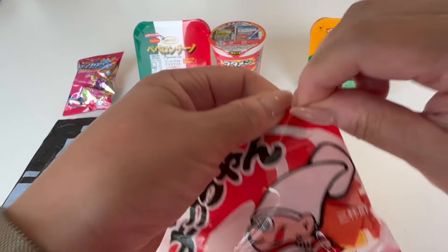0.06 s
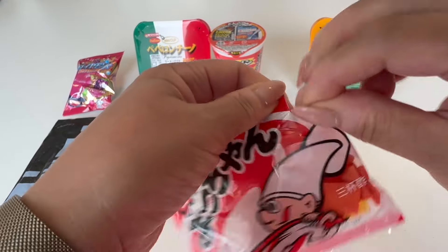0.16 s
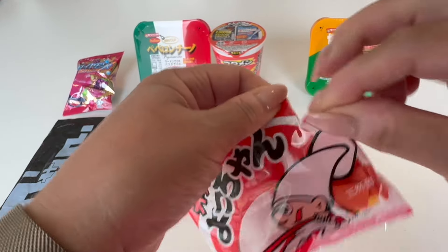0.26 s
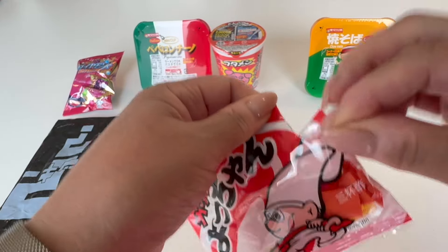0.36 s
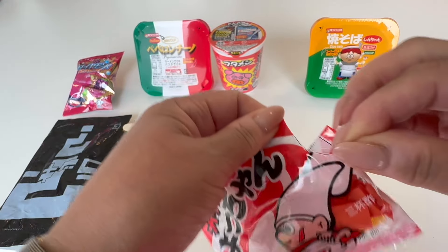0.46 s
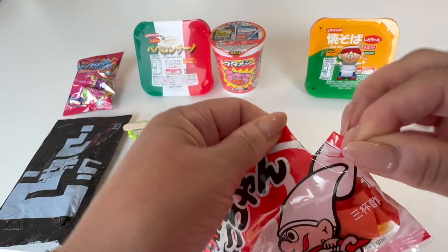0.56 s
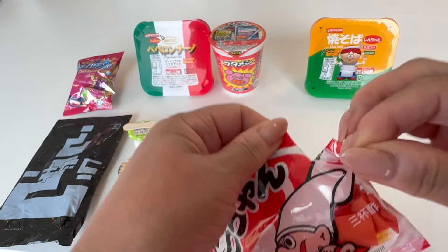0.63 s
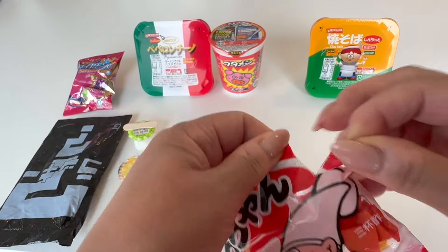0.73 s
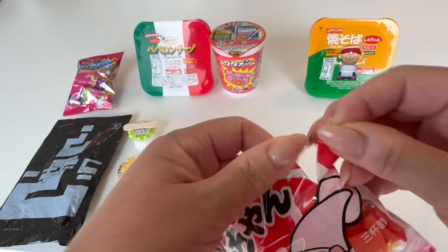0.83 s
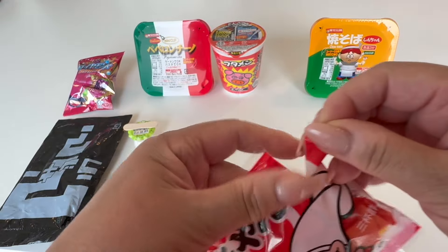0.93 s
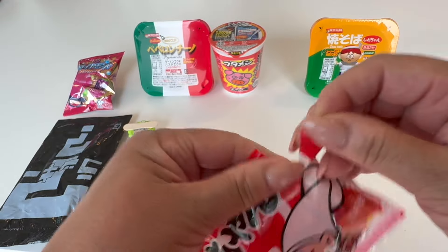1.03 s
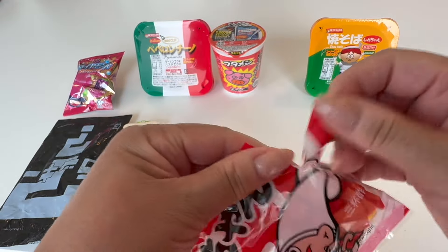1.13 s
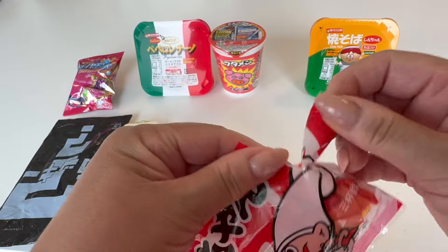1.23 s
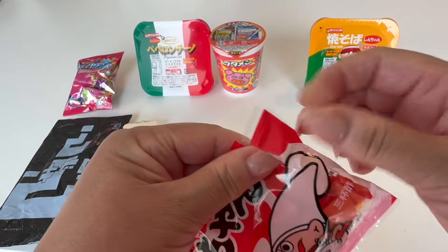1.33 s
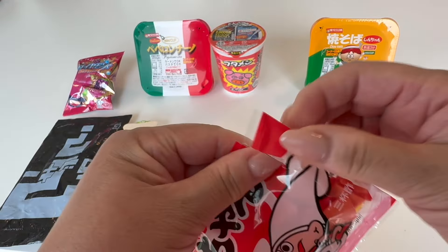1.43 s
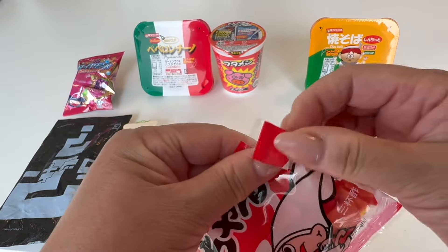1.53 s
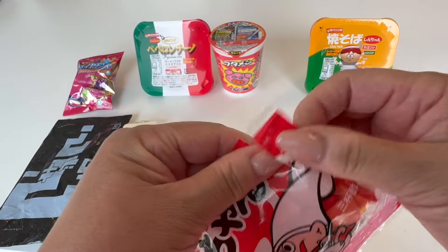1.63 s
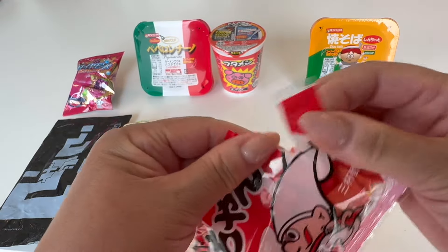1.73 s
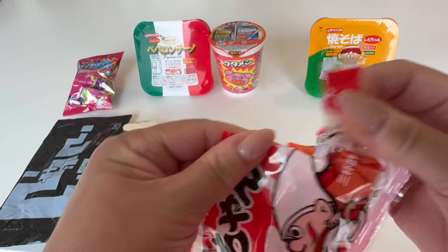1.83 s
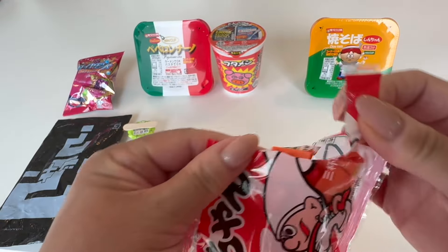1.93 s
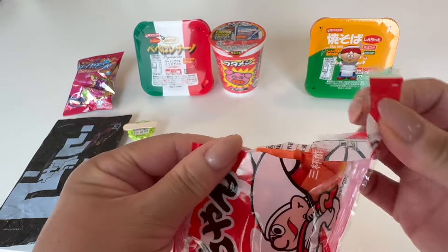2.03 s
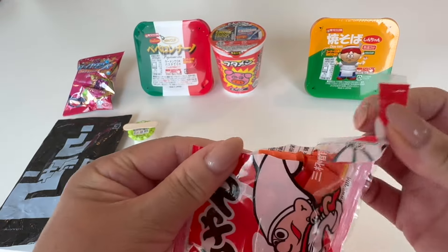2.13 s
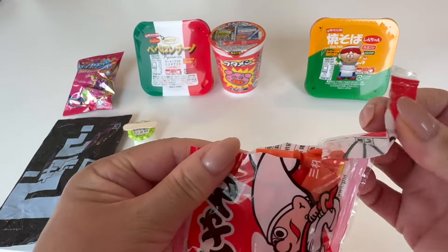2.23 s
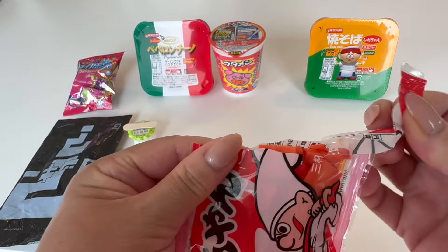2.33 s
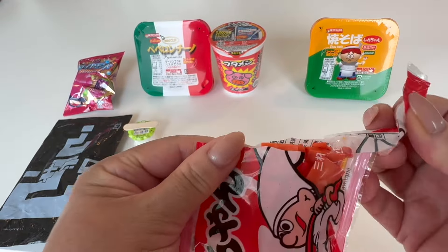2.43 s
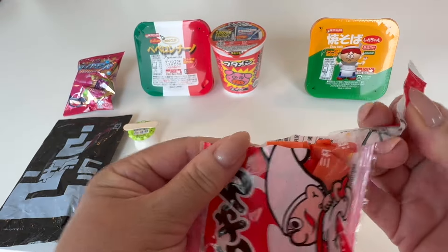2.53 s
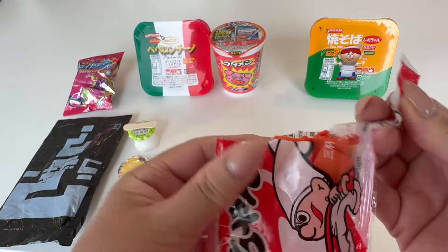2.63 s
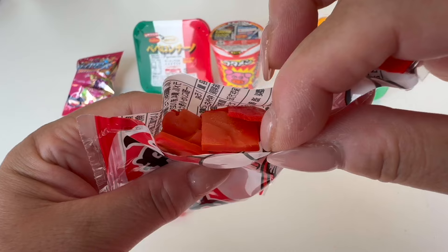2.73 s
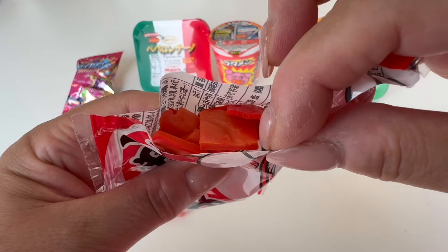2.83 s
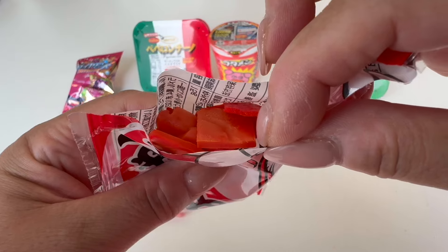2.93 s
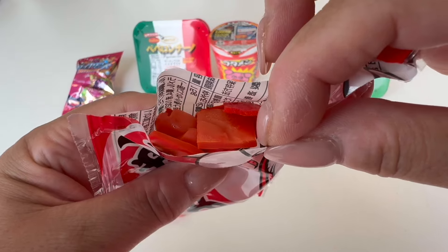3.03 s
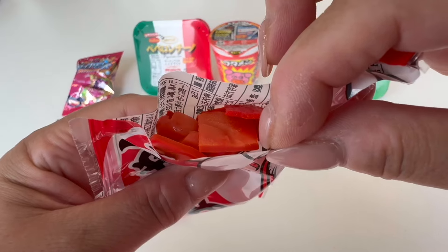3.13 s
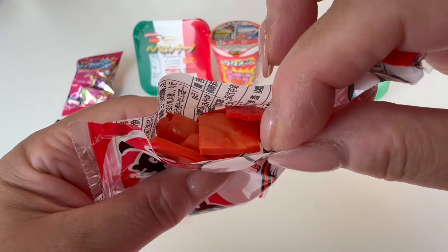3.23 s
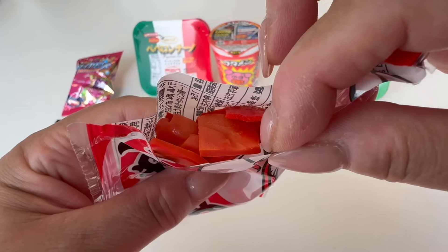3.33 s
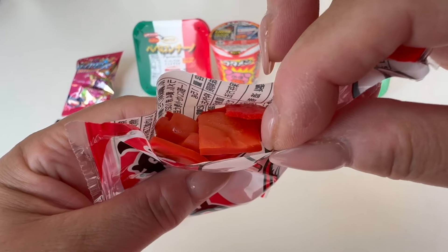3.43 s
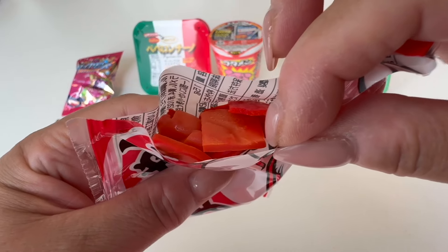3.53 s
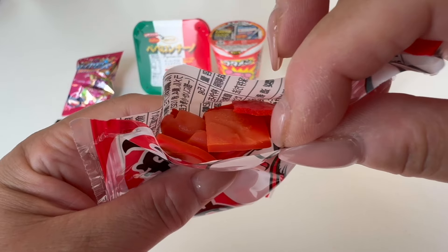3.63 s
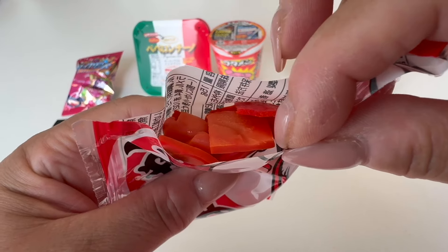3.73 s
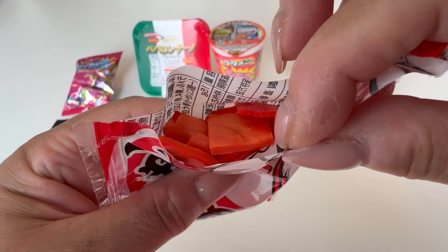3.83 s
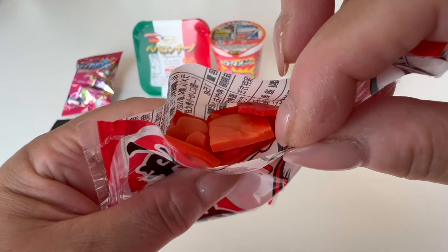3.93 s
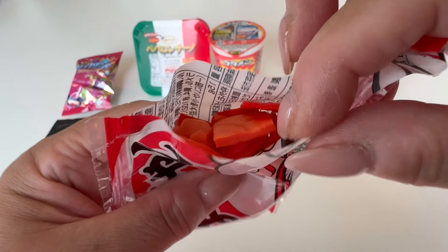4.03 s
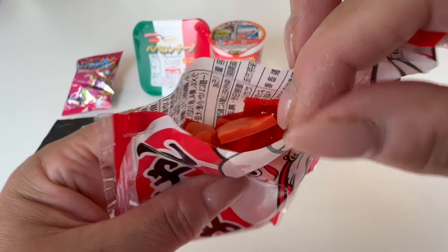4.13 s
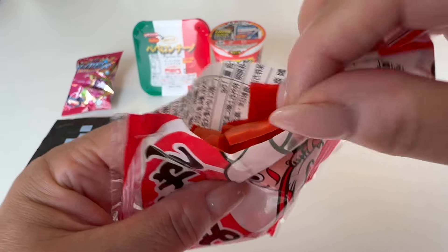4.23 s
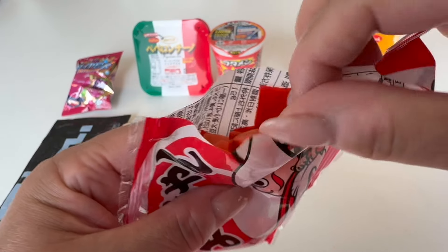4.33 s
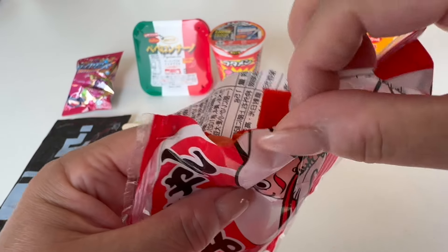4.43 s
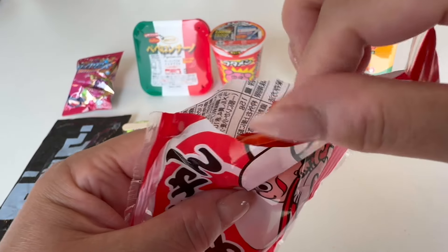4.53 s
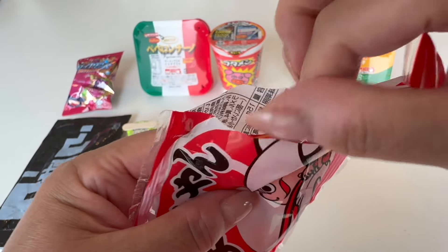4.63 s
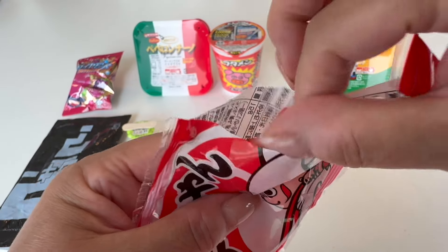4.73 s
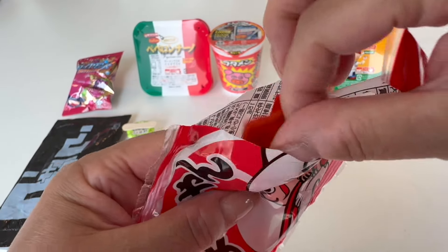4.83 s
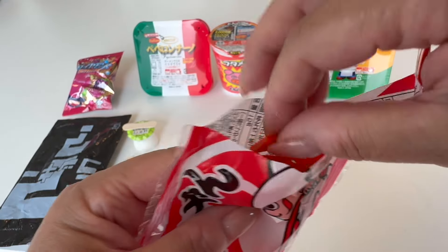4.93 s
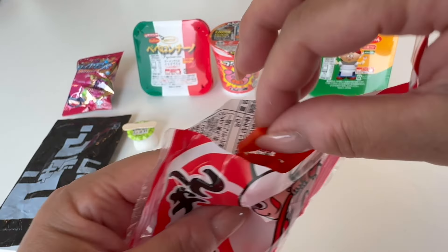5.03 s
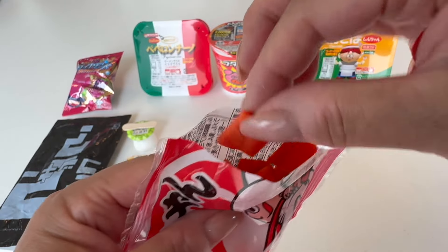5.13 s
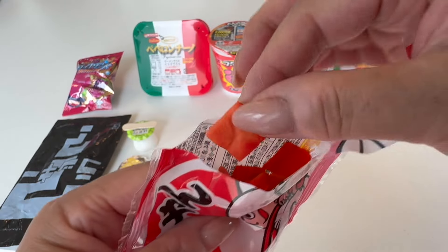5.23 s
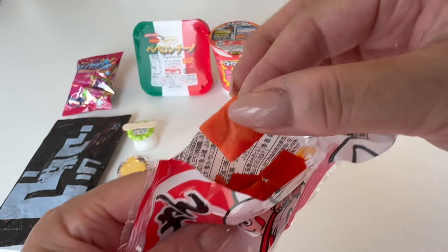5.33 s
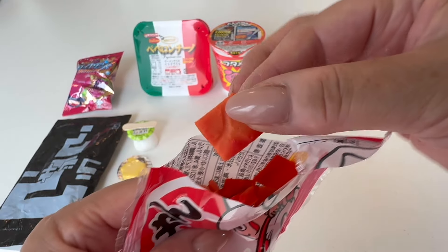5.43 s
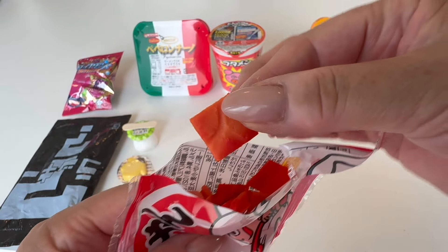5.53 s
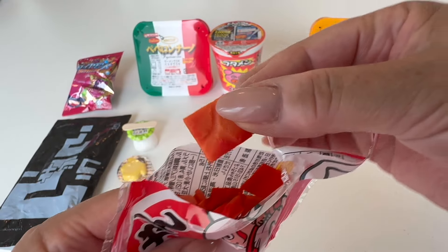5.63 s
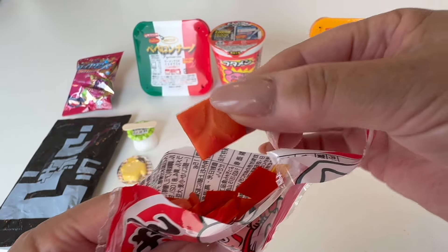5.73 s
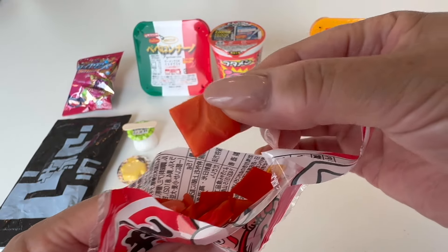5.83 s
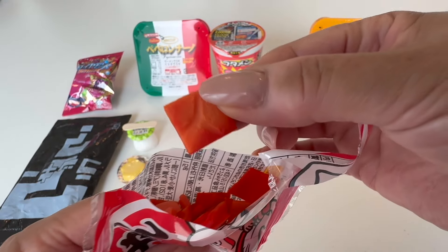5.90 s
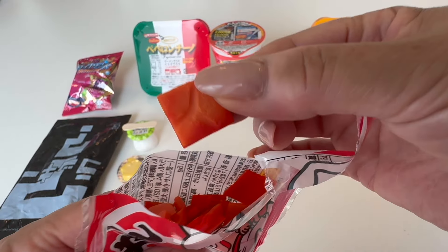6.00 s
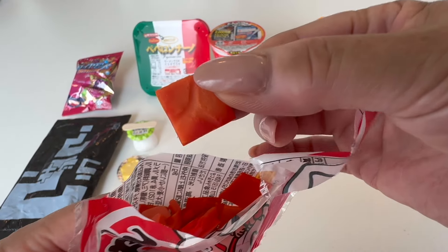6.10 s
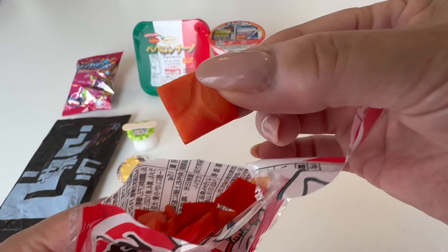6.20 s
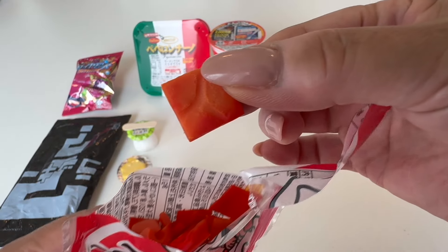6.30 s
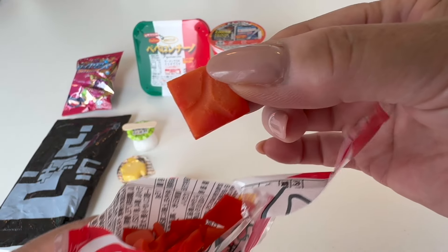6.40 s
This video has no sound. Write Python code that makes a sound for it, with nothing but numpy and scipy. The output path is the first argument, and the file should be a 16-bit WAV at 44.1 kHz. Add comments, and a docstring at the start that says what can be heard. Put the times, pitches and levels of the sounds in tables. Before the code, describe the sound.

Fingers crinkle and tear open a small plastic snack packet up close, crackling brightly, then a sudden lull and sparser, softer crinkles indoors.

```python
"""Hands crinkle and tear a small plastic snack packet close to a phone in a quiet, hard-walled room.
Each crease of the film snaps with a bright tick and a short ring; the air in the bag sometimes thuds.
Each squeeze adds a rush of fine crackle, the hiss of sliding skin and a rumble; the room adds a soft tail.
Crackle and tail stop abruptly at 2.73 s; sparser handling follows from 3.86 s.
Coloured noise makes the steady room hum, with a faint mains tone and a low tone that swells at 5.45 s."""
import sys
import numpy as np
from scipy import signal
from scipy.fft import rfft, irfft, next_fast_len
from scipy.io import wavfile
from scipy.ndimage import uniform_filter1d

SR = 44100
rng = np.random.default_rng(int(sys.argv[2]) if len(sys.argv) > 2 else 0)


def to_wav(s):
    """Save 16-bit WAV."""
    ch = np.atleast_2d(s).T  # columns
    pcm = np.round(np.clip(ch, -1, 1) * 32767)  # PCM
    wavfile.write(sys.argv[1], SR, pcm.astype(np.int16))


N = 284886
CUT_S = 2.733  # crackle and room tail stop here

# broad part of a film ring: (frequency [Hz], relative level [dB])
FILM_SPECTRUM = [(300, -19.5), (1200, 5), (2500, 0), (8000, -7), (9500, -3), (17000, -37.5)]
# tick of a crease, also the colour of the skin hiss: (frequency [Hz], relative level [dB])
TICK_SPECTRUM = [(5000, -4.5), (8500, -2.5), (10500, 2.5), (15500, 5), (16800, -33.5)]


def gain_of(db):
    """Decibels to an amplitude factor."""
    return 10 ** (np.asarray(db) / 20)


def evened(x):
    """Scales to rms 1."""
    return x / np.sqrt(np.mean(x ** 2) + 1e-20)


def smoothed_noise(length_s):
    """Slowly wandering noise of rms 1: white noise under a moving average."""
    return evened(uniform_filter1d(rng.standard_normal(N), round(length_s * SR)))


def read(points, hz):
    """Interpolates a table on a log-frequency axis."""
    table_hz, value = np.transpose(points)
    return np.interp(np.log(hz + 1), np.log(table_hz + 1), value)


def coloured(x, points):
    """Filters along the last axis by a spectrum table in dB."""
    size = x.shape[-1]
    hz = np.fft.rfftfreq(size, 1 / SR)
    return irfft(rfft(x) * gain_of(read(points, hz)), size)


def burst(noise, points, rise_s, t60_s):
    """A coloured noise burst, exponential in rise and decay, whose first 1.5 ms have rms 1."""
    t = np.arange(noise.shape[-1]) / SR
    x = coloured(noise, points) * (1 - np.exp(-t / rise_s)) * gain_of(-60 * t / t60_s)
    return x / np.sqrt(np.mean(x[..., :66] ** 2, -1, keepdims=True))


def swell(start_s, rise_s, fade_db_per_s):
    """An envelope that rises in a straight line, then fades at a steady dB rate."""
    t = np.arange(N) / SR - start_s
    return np.clip(t / rise_s, 0, 1) * gain_of(-fade_db_per_s * np.maximum(t - rise_s, 0))


def pressing(column):
    """Summed squeeze envelopes of crackle (column 1) or hiss (column 2); those before the cut end there."""
    # squeezes of the fingers: (start [s], relative crackle level [dB], skin hiss level [dB])
    squeezes = [(-0.03, -42, -50), (0.269, -39, -81), (0.659, -43.5, -51), (0.9, -47, -55), (1.1, -47, -47),
                (1.27, -40, -58), (1.598, -44, -62), (1.77, -40.5, -50), (2.29, -55, -55), (2.48, -50, -48),
                (2.579, -36, -65), (3.88, -67, -68), (3.965, -68, -68), (4.183, -43, -50), (4.44, -54, -56),
                (4.62, -48.5, -62), (4.699, -51.5, -55), (6.1, -60, -62.5), (6.38, -49.5, -71)]
    before = np.arange(N) < CUT_S * SR
    total = np.zeros(N)
    for row in squeezes:
        start_s = row[0]
        envelope = swell(start_s, rise_s=0.019, fade_db_per_s=77)
        total += gain_of(row[column]) * envelope * (before | (start_s > CUT_S))
    return total


def crackle(per_s=380, spread_db=5.5):
    """Many tiny creases of random size and colour, a rumble and skin hiss, louder where fingers press."""
    # the bag shifting in the hand: (frequency [Hz], relative level [dB])
    rumble_spectrum = [(90, -4.5), (250, 1), (900, -19.5)]
    clump_db, grain_db = 4, 2.5  # unevenness per standard deviation
    clumps = smoothed_noise(0.015)
    size_db = clump_db * clumps + spread_db * np.minimum(rng.exponential(1, N), 3)
    size = gain_of(size_db) * (rng.random(N) < per_s / SR)

    kinds = 12  # each tiny crease takes one of these sounds
    kind = rng.integers(0, kinds, N)
    rings, ticks = np.zeros((2, N)), np.zeros(N)
    for k in range(kinds):
        noise = rng.standard_normal((3, 512))
        train = size * (kind == k)
        ring = burst(noise[:2], FILM_SPECTRUM, rise_s=0.00072, t60_s=0.014)
        tick = burst(noise[2], TICK_SPECTRUM, rise_s=0.00039, t60_s=0.0051)
        rings += signal.oaconvolve(train[None], ring, axes=1)[:, :N]
        ticks += signal.oaconvolve(train, tick)[:N]

    # fingertips slide on the film with a high hiss, broken into short grains
    fine = smoothed_noise(0.002)
    skin = coloured(rng.standard_normal(N), TICK_SPECTRUM)
    skin = evened(skin * gain_of(clump_db * clumps + grain_db * fine))
    rumble = evened(coloured(rng.standard_normal(N), rumble_spectrum))
    grains = gain_of([[-6], [-8]]) * evened(rings)  # rows: left, right
    grains += gain_of(-35.5) * evened(ticks)
    grains += rumble * gain_of(-7 + clump_db * clumps)
    return pressing(column=1) * grains + pressing(column=2) * skin


def room(x):
    """A diffuse tail that builds within a few ms, each band dying at its own speed; cut off at CUT_S."""
    # decay of the tail: (frequency [Hz], t60 [s])
    decay = [(300, 0.6), (2000, 0.46), (5000, 0.67), (10000, 0.55), (16000, 0.089)]
    # colour of the tail: (frequency [Hz], level [dB])
    colour = [(300, -5.5), (2000, -11), (5000, -10.5), (10000, -17.5), (16000, -27.5)]
    hz, t, z = signal.stft(rng.standard_normal((2, SR)), SR, nperseg=256)
    z = z * gain_of(-60 * t / read(decay, hz)[:, None])
    z = z * (1 - np.exp(-(t / 0.00055) ** 2))
    z = z / np.linalg.norm(z, axis=-1, keepdims=True)  # equal energy in every band
    tail = signal.istft(z, SR, nperseg=256)[1]
    tail = coloured(tail / np.linalg.norm(tail[0]), colour)
    before = np.arange(N) < CUT_S * SR
    return sum(part * signal.fftconvolve(x * part, tail, axes=1)[:, :N] for part in (before, ~before))


def hum():
    """Steady air noise, alike at both ports only in the bass, a faint mains tone and a passing low tone."""
    # air noise: (frequency [Hz], relative level per Hz [dB])
    spectrum = [(40, -6.5), (52, -4.5), (66, -3.5), (80, -13), (130, -11.5), (160, -2), (240, -5),
                (480, -5.5), (1180, -14.5), (4480, -34), (8830, -46), (16500, -57)]
    # likeness of the ports: (frequency [Hz], left-right correlation [0-1])
    likeness = [(60, 0.94), (600, 0.79), (1200, 0.18), (2500, 0.18)]
    # balance: (frequency [Hz], left over right [dB])
    balance = [(60, 1.5), (950, 2.5), (15000, 7)]
    # room resonances: (frequency [Hz], boost [dB])
    booms = [(214, 5.5), (242, 7.2), (477, 6)]
    boom_width_hz, port_lag_s = 4.3, 0.00043  # the right port hears the hum later
    drone_hz, drone_db = 98, -52.5

    frames, hz = N // 2048 + 5, np.fft.rfftfreq(8192, 1 / SR)
    a, b, c, d, patches = rng.standard_normal((frames, 4097, 5)).T
    # level wanders a little over time and frequency
    patches = uniform_filter1d(patches, size=24, axis=0)
    patches = evened(uniform_filter1d(patches, size=3, axis=1))
    same = np.clip(read(likeness, hz), 0, 1)[:, None]
    left = a + 1j * b
    right = same * left + np.sqrt(1 - same ** 2) * (c + 1j * d)
    z = np.array([left, right])
    z[1] *= np.exp(-2j * np.pi * hz * port_lag_s)[:, None]
    booms_db = sum(db / (1 + ((hz - f) / boom_width_hz) ** 2) for f, db in booms)
    tilt_db = np.array([[.5], [-.5]]) * read(balance, hz)
    z *= gain_of((read(spectrum, hz) + booms_db + tilt_db)[..., None] + 1.1 * patches)
    air = gain_of(-47) * evened(signal.istft(z, nperseg=8192, noverlap=6144)[1][:, :N])

    t = np.arange(N) / SR
    mains = gain_of(-59.5) * np.sin(2 * np.pi * 50 * t)
    drone_level = gain_of(drone_db) * swell(start_s=5.45, rise_s=0.093, fade_db_per_s=15)
    drone = drone_level * np.sin(2 * np.pi * drone_hz * t)
    return air + drone + mains


def snap(ring_db, ring_hz, tick_db, tick_hz):
    """One crease: a film patch rings a few cycles under a bright tick; rows left, right, into the room."""
    # a ring leans on its pitch: (multiple of the pitch, relative level [dB])
    patch = [(.2, -23), (.65, -12), (0.999, -3), (1.6, -3.5), (5, -3)]
    tick_lean_db = -46.5  # times the square of the octaves from tick_hz
    t = np.arange(1024) / SR
    noise = rng.standard_normal((4, 1024))
    lean = [(k * ring_hz, db) for k, db in patch]
    # part shared by both ports, part differing between them
    port_noise = 0.3 * noise[0] + 1.52 * noise[1:3]
    broad = burst(coloured(port_noise, lean), FILM_SPECTRUM, rise_s=0.0007, t60_s=0.0078)
    cycles = ring_hz * t
    tone = np.sin(2 * np.pi * cycles) * cycles * gain_of(-8.5 * cycles)
    ring = gain_of(ring_db + np.array([[1.2], [-1.2]])) * (1.16 * broad + 7 * tone)

    bright = [(hz, read(TICK_SPECTRUM, hz) + tick_lean_db * np.log2(hz / tick_hz) ** 2)
              for hz in np.geomspace(5000, 17000, num=16)]
    tick = gain_of(tick_db) * burst(noise[3], bright, rise_s=.0005, t60_s=.0024)

    # summed over all directions the fine colour evens out: filtered pulses go into the room
    pulse = np.roll(t == 0, shift=128) * 1.
    soft_lean = [(hz, 0.9 * db) for hz, db in lean]
    wide_ring = coloured(coloured(pulse, soft_lean), FILM_SPECTRUM)
    wide_tick = coloured(pulse, bright)
    far = evened(wide_ring) * np.std(ring) + evened(wide_tick) * np.std(tick)
    return np.vstack([ring + tick, far])


def thud(level_db, hz):
    """The bag's air modes die within a few cycles and sag in pitch as the film slackens."""
    # modes of the bag: (multiple of the pitch, relative level [dB])
    bag_modes = [(0.551, -7), (0.999, 2), (1.5, -0.5), (2.2, 3.5)]
    t = np.arange(1024) / SR
    cycles = hz * t * (1 - 8 * t)
    modes = sum(gain_of(db - 6.37 * k * hz * t) * np.sin(2 * np.pi * k * cycles) for k, db in bag_modes)
    envelope = (1 - np.exp(-t / 0.00094)) * np.hanning(2048)[1024:]
    levels = gain_of(level_db + np.array([[2.4], [-1.6], [0]]))  # left, right, into the room
    return levels * modes * envelope


def snaps():
    """The creases and thuds that stand out, each placed at its time; rows left, right, into the room."""
    # creases: (time [s], relative ring level [dB], ring [Hz], tick level [dB], tick [Hz])
    creases = [(0.049, -47, 3280, -40, 13400), (0.0708, -22, 1890, -18.0, 12600),
               (0.0998, -38, 1460, -59.0, 10500), (0.1064, -48, 7400, -28, 12900),
               (0.1182, -36, 4740, -53, 10400), (0.1291, -36, 4600, -32, 13300),
               (0.2152, -32.5, 4600, -20.5, 11300), (0.2248, -28.5, 2040, -56.0, 11400),
               (0.274, -40.5, 2930, -36.0, 13000), (0.2876, -33.5, 4600, -15.5, 13700),
               (0.3132, -58.5, 4600, -41.0, 12800), (0.3164, -33, 4200, -35.5, 12300),
               (0.6073, -39, 5300, -42, 9800), (0.6966, -47, 4400, -44, 11100),
               (0.7182, -40, 8540, -23.5, 11000), (0.7563, -43, 1500, -41, 10800),
               (0.7694, -34.5, 8700, -25, 13300), (0.7722, -37.5, 8000, -29, 11700),
               (0.7751, -39, 1420, -35, 10800), (0.8447, -37.5, 2970, -16.5, 12000),
               (0.8622, -37.5, 2210, -42.0, 13700), (0.8681, -35.5, 2480, -34.5, 12300),
               (0.9678, -41.5, 2950, -51, 10900), (0.9765, -38, 2360, -49.0, 12000),
               (0.9903, -37, 4600, -22, 11500), (1.0792, -54.5, 4400, -41.5, 11500),
               (1.096, -24.5, 8100, -18.5, 10500), (1.1032, -39.5, 2350, -35, 10600),
               (1.1135, -33.5, 3000, -35, 10700), (1.1261, -38, 4730, -35.0, 12100),
               (1.1307, -32.5, 1760, -25, 14400), (1.2263, -30.5, 3720, -36, 12200),
               (1.2318, -34, 4400, -26.5, 12200), (1.2898, -45.5, 7600, -29, 11200),
               (1.2982, -27, 8700, -36, 12800), (1.3089, -30.5, 4830, -30.5, 12700),
               (1.3127, -19.5, 8200, -34, 11900), (1.3429, -36.5, 2630, -36, 12300),
               (1.4538, -36, 4150, -42, 11800), (1.5846, -31.5, 5500, -31.5, 11300),
               (1.608, -36, 4900, -31.5, 10400), (1.615, -34.5, 2640, -37, 10600),
               (1.7536, -32.5, 2600, -26.5, 14900), (1.7685, -29, 2600, -23.0, 11200),
               (1.7715, -34.5, 2000, -28.5, 10600), (1.7989, -39, 4450, -38, 12700),
               (1.8148, -32, 2200, -49, 11000), (1.829, -49, 4500, -35, 11000),
               (1.8463, -26.5, 4900, -22, 12400), (1.8485, -33.5, 2300, -24.5, 14700),
               (1.854, -34, 2900, -39, 13800), (1.927, -29.5, 2890, -26.5, 10700),
               (1.9531, -29, 6000, -23, 11800), (1.9735, -33.5, 4050, -25.5, 13400),
               (2.0122, -33.5, 7100, -39, 12800), (2.0155, -31.5, 2600, -25, 11200),
               (2.0263, -34.5, 2920, -12, 11000), (2.137, -38, 2520, -58, 11300),
               (2.1585, -42, 3200, -36, 11900), (2.1746, -42.5, 3860, -27.5, 12400),
               (2.3134, -34.5, 4070, -21, 12000), (2.4712, -26, 5640, -21.5, 14300),
               (2.4871, -23, 4100, -22.5, 10700), (2.5495, -36.5, 2380, -36, 12100),
               (2.5706, -36, 4900, -48, 11500), (2.6143, -44, 4400, -20, 10400),
               (2.6186, -24, 7000, -22, 12100), (2.6243, -36.5, 6850, -32, 12100),
               (2.6821, -37, 2240, -55, 11700), (2.7038, -34, 6000, -35, 11700),
               (2.7109, -27.5, 6800, -20, 12100), (2.722, -24.5, 7900, -21.5, 12300),
               (3.8555, -60, 4200, -68, 11300), (3.9272, -35, 3600, -60, 10200),
               (3.9776, -43.5, 3800, -52, 14100), (4.1356, -54.5, 3900, -72, 10100),
               (4.1524, -43, 3550, -49, 10700), (4.1756, -30, 3930, -43, 10700),
               (4.2345, -39.5, 3800, -60.0, 12900), (4.3957, -27.5, 5260, -17, 13900),
               (4.4545, -27, 5300, -17.5, 13600), (4.508, -41, 3930, -46.0, 10900),
               (4.5778, -32, 6200, -31, 12000), (4.7191, -39.5, 4240, -51, 10900),
               (4.747, -37, 3130, -55.0, 10100), (4.7701, -23.5, 3540, -22.5, 11100),
               (4.8842, -46, 2400, -57, 11900), (4.9733, -35, 3860, -37, 11500),
               (4.9937, -36.5, 3340, -37, 11200), (5.0413, -32.5, 1400, -25.5, 11300),
               (5.0858, -42.5, 3070, -48, 10900), (5.2186, -42, 4200, -72, 11000),
               (5.3883, -44, 2040, -45.5, 9900), (5.4106, -61, 7060, -56, 11260),
               (5.6978, -52.5, 4030, -53.5, 12450), (5.705, -47.5, 7800, -42, 10900),
               (6.4003, -49, 8250, -46, 11260), (6.4313, -49, 7900, -45.0, 12900)]
    # thumps of the air in the bag: (time [s], relative level [dB], starting pitch [Hz])
    thumps = [(0.0705, -28.5, 483), (0.087, -27.5, 377), (0.2165, -26.5, 580), (0.315, -28, 390),
              (0.327, -27.5, 290), (0.407, -33.5, 315), (0.868, -31.5, 390), (1.113, -20, 730),
              (1.127, -26.5, 540), (1.228, -26, 484), (1.3075, -19.5, 707), (1.312, -30.5, 292),
              (1.454, -29, 330), (1.746, -32.5, 501), (1.849, -30, 340), (2.615, -29, 430),
              (2.625, -29, 293), (5.0415, -20, 606)]
    out = np.zeros((3, N + 1024))
    for table, sound in ((creases, snap), (thumps, thud)):
        for time_s, *settings in table:
            start = round(time_s * SR)
            out[:, start:start + 1024] += sound(*settings)
    return out[:, :N]


def scene():
    """Packet, its tail in the room, and hum; the packet is nearer the left port, more so after the cut."""
    lag_samples = 9  # the right port hears the packet later
    (left, right, far), fine = snaps(), crackle()
    after = np.arange(N) > CUT_S * SR
    near_left = left + fine[0]
    near_right = np.roll(right + fine[1], lag_samples) * gain_of(-2.5 * after)
    return np.array([near_left, near_right]) + room(far + fine) + hum()


def record(dry):
    """Two ports apart below the treble; above, the left one feeds both sides, the right side shifted early."""
    shared_hz, lead_s, in_phase_hz = 9000, .000327, 11100
    edge_hz = 16900  # upper band limit
    size = next_fast_len(N + 64)
    hz = np.fft.rfftfreq(size, 1 / SR)
    left, right = rfft(dry, size)
    shared = np.clip((hz - shared_hz) / 600 + .5, 0, 1)
    early = left * np.exp(2j * np.pi * (hz - in_phase_hz) * lead_s)
    pair = irfft(np.array([left, (1 - shared) * right + shared * early]), size)[:, :N]
    pair = signal.sosfilt(signal.butter(6, 40, "highpass", fs=SR, output="sos"), pair)
    lowpass = signal.firwin(255, edge_hz, window=("kaiser", 9), fs=SR)
    return signal.oaconvolve(pair, lowpass[None], "same")


dry = scene()
out = record(dry)
to_wav(out)
```